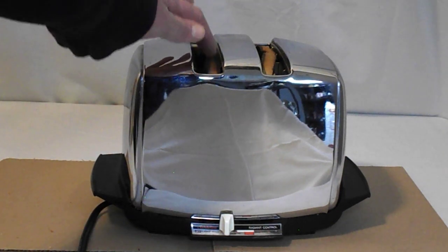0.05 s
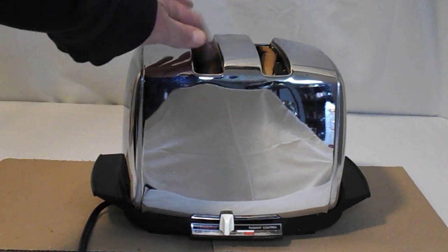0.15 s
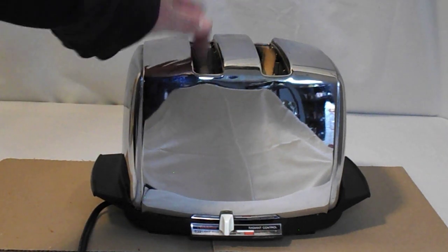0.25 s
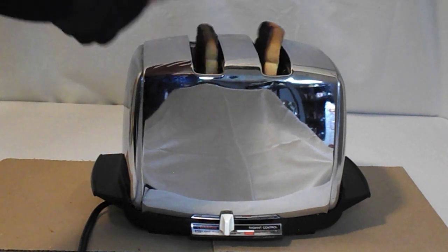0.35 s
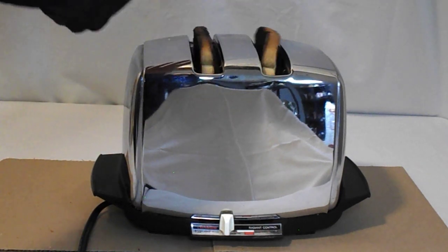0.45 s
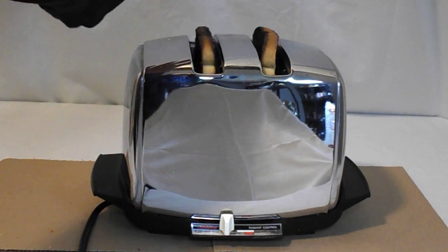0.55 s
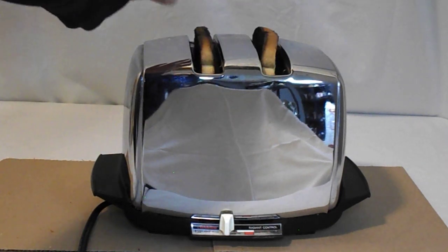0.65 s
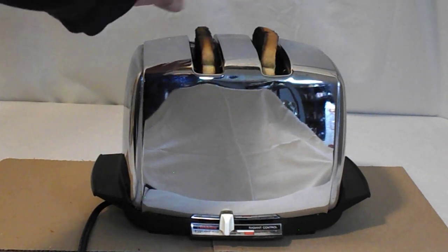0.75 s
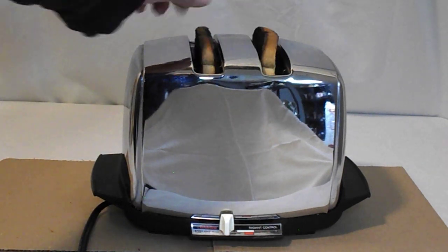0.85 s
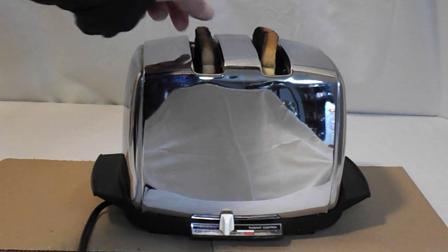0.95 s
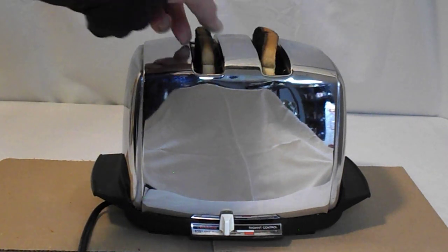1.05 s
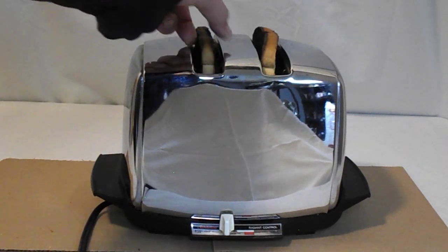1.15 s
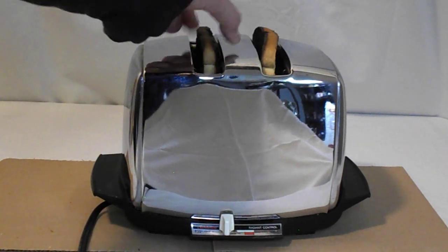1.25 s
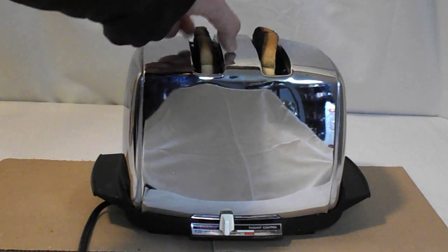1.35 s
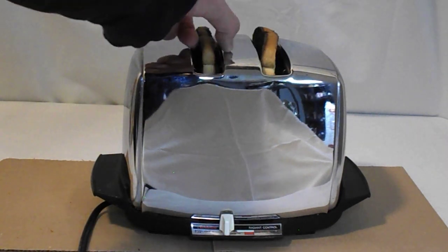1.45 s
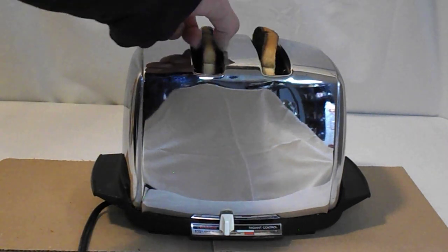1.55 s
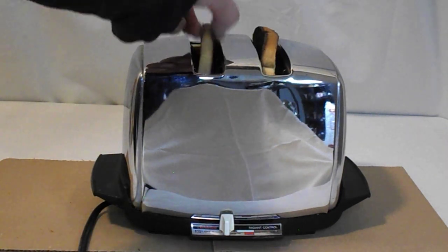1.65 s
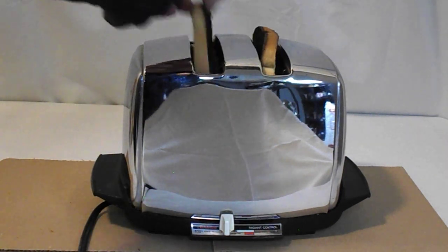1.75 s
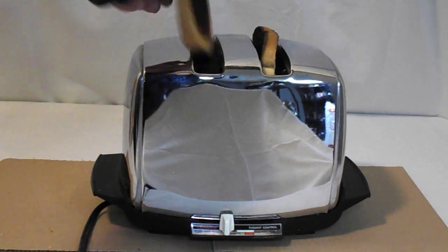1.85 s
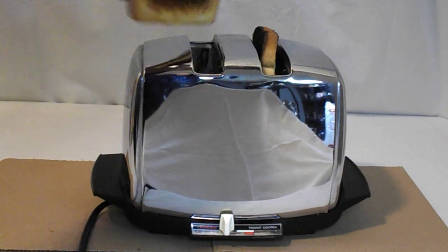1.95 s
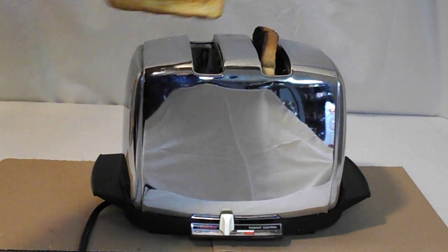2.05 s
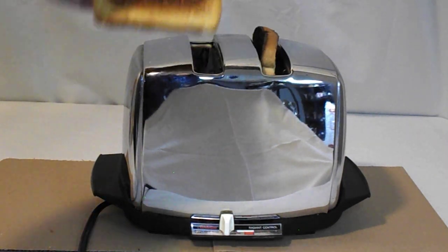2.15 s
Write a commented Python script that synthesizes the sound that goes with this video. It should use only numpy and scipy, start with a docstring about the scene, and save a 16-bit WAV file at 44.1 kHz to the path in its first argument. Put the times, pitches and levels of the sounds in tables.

```python
"""A small, quiet room: still air, and a chrome toaster heard through one narrow-band microphone.
First two slices of toast ride up: scraping bursts of grains and hard clacks ring steel modes; crusts squeal.
During the ride a wire starts to ring on, as two slowly beating sines; then a finger taps the shell, a knock and a tick.
Last, one slice is drawn out: it rasps in short grain bursts, plucks the guard wires, knocks the slot's rim
and makes the shell hum."""
import sys
import numpy as np
from scipy import signal
from scipy.fft import rfft, irfft
from scipy.io import wavfile
from scipy.ndimage import uniform_filter1d

SR = 44100
rng = np.random.default_rng(int(sys.argv[2]) if len(sys.argv) > 2 else 0)


def int16_out(signal):
    """Quantize to a 16-bit WAV file."""
    q = np.round(np.clip(np.atleast_2d(signal).T, -1, 1) * 32767)
    wavfile.write(sys.argv[1], SR, q.astype(np.int16))


N = 97020
T = np.arange(N) / SR  # seconds


def from_db(db):
    """Decibels to gain."""
    return 10 ** (np.asarray(db) / 20)


def unit(x):
    """Scale to an energy of one."""
    return x / np.sqrt(np.sum(x ** 2) + 1e-20)


def through(x, response):
    """Pass a sound through an impulse response."""
    return signal.fftconvolve(x, response[:N])[:N]


def colour(points, size=8192):
    """Causal, minimum-phase impulse response of a spectrum, by folding its cepstrum."""
    hz, db = np.transpose(points)
    bins = np.maximum(np.fft.rfftfreq(size, 1 / SR), 1)
    gain = from_db(np.interp(np.log(bins), np.log(hz), db))
    cepstrum = irfft(np.log(gain))
    cepstrum[1:size // 2] *= 2
    cepstrum[size // 2 + 1:] = 0
    return irfft(np.exp(rfft(cepstrum)))


def above(x, hz):
    """Second-order high-pass."""
    return signal.sosfilt(signal.butter(2, hz, "high", fs=SR, output="sos"), x)


def below(x, hz, order):
    """Low-pass of the given order."""
    return signal.sosfilt(signal.butter(order, hz, fs=SR, output="sos"), x)


def envelope(start, hold, fade, attack=0.0005):
    """Quick attack, hold, exponential release; all in seconds."""
    release = np.exp(-np.maximum(T - start - hold, 0) / max(fade, 1e-4))
    return np.clip((T - start) / attack, 0, 1) * release


def ring(modes, start=0):
    """Decaying sines set off at one moment."""
    t = np.maximum(T - start, 0)
    return sum(from_db(db - 60 * t / t60) * np.sin(2 * np.pi * hz * t) for hz, db, t60 in modes)


GRAINS_PER_S, GRAIN_SPREAD_DB = 2400, 4


def grains(rate, size=400):
    """Tiny fractures and slips of uneven size, at a steady mean level."""
    sizes = from_db(GRAIN_SPREAD_DB * np.minimum(rng.exponential(1, N), 4))
    clicks = (rng.random(N) < rate / SR) * rng.choice([-1, 1], N) * sizes
    local_power = np.maximum(uniform_filter1d(clicks ** 2, size), 0)
    return clicks / np.sqrt(local_power + 0.00081)


# modes of the steel shell: (pitch_hz, level_db, t60_s), levels relative
SHELL_MODES = [(440.4, -6, 0.4), (486, -5, 0.33), (543.4, -7.5, 0.27), (674, -10, 0.4), (1012, -16, .25),
               (1069, -6.5, 0.13), (1132, -7, 0.21), (1715, -10.5, 0.41), (2333, -6.5, 0.32),
               (2392, -8, 0.21), (3606, -12, 0.31), (3730, -8.5, 0.22), (4310, -5.5, 0.19),
               (5690, -7.5, .14)]
SHELL_LOW_HZ, RASP_DB = 400, 2
BRIGHT_ABOVE_HZ, CRACKLE_ABOVE_HZ, CRACKLES_PER_S = 2820, 5870, 550


def scrape(catches, spectrum, shell_db, paths):
    """Each catch is a burst of grains; the contact moves from point to point, and all of them ring the shell."""
    crumbs = above(above(grains(CRACKLES_PER_S), CRACKLE_ABOVE_HZ), CRACKLE_ABOVE_HZ)
    dull = below(grains(GRAINS_PER_S), BRIGHT_ABOVE_HZ, 2)
    sharp = above(grains(GRAINS_PER_S), BRIGHT_ABOVE_HZ)
    forces = []
    for start, db, hold, fade, bright_db, crackle_db in catches:
        texture = dull + from_db(bright_db) * sharp + from_db(crackle_db) * crumbs
        forces.append(from_db(db) * envelope(start, hold, fade) * texture)
    # successive catches take the paths in turn
    rasp = sum(through(sum(forces[k::len(paths)]), way) for k, way in enumerate(paths))
    shell = unit(above(above(ring(SHELL_MODES), SHELL_LOW_HZ), SHELL_LOW_HZ))
    direct = from_db(RASP_DB) * through(rasp, colour(spectrum))
    return direct + from_db(shell_db) * through(sum(forces), shell)


# carriage and crusts catch on the way up, levels relative:
# (start_s, level_db, hold_s, fade_time_constant_s, brightness_db, crumb_crackle_db)
RISE_CATCHES = [(.2132, -43, .006, 0.0076, -9, -38.5), (.234, -46, 0.01, 0.008, -8, 5.5),
                (.2715, -44, 0.0048, 0.0021, 2.5, -13), (.277, -38, 0.017, 0.018, -4, 2.5),
                (.3005, -40, 0.009, 0.011, 9.5, -6), (.333, -40, 0.017, 0.0046, -3, 9.5),
                (.357, -35.5, 0.018, 0.0054, 6, 3), (.380, -34, 0.0055, 0.0017, 3.5, -2),
                (.403, -34, 0.0094, 0.006, 0.5, 2), (.420, -33, 0.0059, 0.013, 0, 4),
                (.4545, -36.5, 0.0096, 0.015, -15, 4.5), (.504, -37.5, 0.0099, 0.021, -4, 6),
                (.537, -38, 0.031, 0.029, -5, 2), (.594, -46, 0.011, 0.0077, -10, -6),
                (.631, -49.5, 0.0071, 0.0029, 2, 7), (.680, -49, 0.0086, 0.0098, -3.5, -6),
                (.733, -56, 0.0092, 0.034, -8, -9)]
# spectrum of the rising scrape: (frequency_hz, relative_level_db)
RISE_SPECTRUM = [(30, -55), (120, -23.5), (370, -12), (435, -1), (620, 3.5), (870, -2.5), (1150, 2.5),
                 (1500, -1), (2700, 1.5), (4400, 3.5), (5400, 1), (6500, -0.5), (11000, -1.5)]


def rise(paths):
    """Carriage and crusts scrape up the slots in bursts and shake the shell."""
    return scrape(RISE_CATCHES, RISE_SPECTRUM, -9.5, paths)


# carriage and crust knock the guides, later the slot's rim:
# (start_s, clack_db, panel_ring_db), levels relative
HARD_KNOCKS = [(0.2131, -31, -41.5), (0.3021, -28, -42), (0.3527, -26.5, -44), (0.3817, -28.5, -38.5),
               (0.4193, -30, -44), (0.5377, -33.5, -47.5), (1.977, -44, -49)]
# spectrum of a clack: (frequency_hz, relative_level_db)
KNOCK_SPECTRUM = [(100, -32), (370, -23), (480, -6.5), (850, -12), (1250, 0.5), (2600, 3.5), (4300, 3),
                  (6000, -2), (7500, -5), (11000, -11.5)]
# modes of the top panel, also rung by the finger: (pitch_hz, level_db, t60_s), levels relative
PANEL_MODES = [(441, -16.5, 0.25), (543, -11, 0.042), (720, -18, 0.24), (1091, -8, 0.11),
               (1128, -7.5, 0.15), (1590, -8.5, 0.1), (1616, -14, 0.051), (2444, -24, .17),
               (2710, -20, 0.19)]
KNOCK_S = 0.0027  # both hold and fade time constant


def knocks(way):
    """Short, hard clacks of noise that also ring the top panel."""
    bursts = sum(from_db(db) * envelope(s, KNOCK_S, KNOCK_S, attack=0.00032) for s, db, _ in HARD_KNOCKS)
    force = bursts * rng.choice([-1, 1], N)
    panel = sum(from_db(db) * ring(PANEL_MODES, s) for s, _, db in HARD_KNOCKS)
    return through(through(force, colour(KNOCK_SPECTRUM)), way) + above(panel, SHELL_LOW_HZ)


# the crust sticks and slips on a guard wire: (start_s, level_db, length_s, mean_pitch_hz)
WIRE_SQUEALS = [(.3015, -35, 0.016, 4740), (0.353, -32, 0.0066, 4650), (0.375, -55, .005, 4270),
                (0.5385, -35, 0.0095, 4680), (0.535, -39.5, 0.011, 4850)]


def squeals(fade_s, waver_hz, size=150):
    """Stick and slip of crust on wire gives short whistles of unsteady pitch."""
    out = 0
    for start, db, length, hz in WIRE_SQUEALS:
        waver = np.sqrt(size) * uniform_filter1d(rng.standard_normal(N), size)
        phase = 2 * np.pi * np.cumsum(hz + waver_hz * waver) / SR
        out = out + from_db(db) * envelope(start, length, fade_s) * np.sin(phase)
    return out


SPRING_HZ, SPRING_S, SPRING_DB, SPRING_T60_S = 2763, .38, -55, 2.14
SPRING_SPLIT_HZ, SPRING_TWIN_DB = 1.16, -8


def spring():
    """A plucked wire swings in two planes at nearly the same pitch; the slow beat holds up its ring at first."""
    first = ring([(SPRING_HZ, SPRING_DB, SPRING_T60_S)], SPRING_S)
    twin = ring([(SPRING_HZ + SPRING_SPLIT_HZ, SPRING_DB + SPRING_TWIN_DB, SPRING_T60_S)], SPRING_S)
    return first - twin


# the slice drags out of its slot, levels relative:
# (start_s, level_db, hold_s, fade_time_constant_s, brightness_db, crumb_crackle_db)
PULL_CATCHES = [(1.684, -60.5, 0.012, .02, 4.5, -16), (1.729, -60.5, 0.041, 0.042, 5.5, 9),
                (1.818, -54.5, .012, 0.0075, 2, -6), (1.834, -57, 0.049, 0.012, 3, 8),
                (1.891, -49, 0.022, 0.0062, 0.5, -9), (1.924, -47, 0.0062, 0.0094, 4, 8),
                (1.973, -48, 0.016, 0.0074, -5.5, 9), (2.052, -57, .005, 0.013, -13, 4),
                (2.085, -59.5, 0.0071, 0.0037, -9.5, 9.5), (2.172, -66.5, 0.0026, 0.0035, 11, -4)]
# spectrum of the drawn-out scrape: (frequency_hz, relative_level_db)
PULL_SPECTRUM = [(30, -27), (120, -20.5), (300, 1), (550, 5.5), (850, -0.5), (1150, 4), (1800, 3),
                 (2500, -6), (3300, 0.5), (4000, 5), (5000, -3), (6500, -5.5), (11000, -6)]


def pull(paths):
    """One slice rasps out of its slot in bursts and shakes the shell."""
    return scrape(PULL_CATCHES, PULL_SPECTRUM, -17, paths)


# the slice leans on the shell: (start_s, level_db, length_s); length is both swell and hold
SHELL_LEANS = [(1.691, -55, 0.013), (1.838, -50.5, 0.028), (1.892, -42, 0.015), (1.987, -42.5, 0.0083),
               (2.082, -56, 0.0083)]
HUM_HZ, HUM_T60_S = 436, .19


def shell_hum():
    """A low shell mode swells while the slice leans on it, then dies away; leans add in power."""
    fade = HUM_T60_S / np.log(1000)
    power = sum((from_db(db) * envelope(s, length, fade, length)) ** 2 for s, db, length in SHELL_LEANS)
    return np.sqrt(power) * np.sin(2 * np.pi * HUM_HZ * T)


# the crust plucks a guard wire: (start_s, level_db), relative
WIRE_PLUCKS = [(1.729, -53.5), (1.756, -56.5), (1.835, -48), (1.893, -48.5)]
# modes of a guard wire: (pitch_hz, mean_level_db, t60_s), levels relative
WIRE_MODES = [(1665, -10, 0.7), (2114, -9, 0.48), (3030, -11, 0.54), (3760, -7, 0.21), (3840, -9, 0.14),
              (4040, -1, 0.17), (4820, -8.5, 0.26), (5315, -4.5, 0.11), (6280, -5, 0.079),
              (9330, -1, 0.093), (11100, -6, .11)]
PLUCK_RISE_S = 0.0048


def guard_wire():
    """Each pluck rings the wire's modes with new strengths."""
    out = 0
    for start, db in WIRE_PLUCKS:
        modes = [(hz, db + mode_db + rng.normal(0, 0.93), t60) for hz, mode_db, t60 in WIRE_MODES]
        out = out + ring(modes, start) * np.clip((T - start) / PLUCK_RISE_S, 0, 1)
    return out


# spectrum of the nail's tick: (frequency_hz, relative_level_db)
TAP_SPECTRUM = [(100, -11), (500, -1), (870, -8), (1400, 6.5), (2200, -1.5), (2900, -3.5), (3800, -2.5),
                (6500, -8.5), (11000, -3.5)]
TAP_S, TAP_DB, TAP_TICK_DB, TAP_SOFT_S = 1.1615, -36.5, -44, 0.0044


def finger_tap(way):
    """A soft fingertip rings the top panel with a slowed onset; the nail adds a tick of grains."""
    knock = from_db(TAP_DB) * ring(PANEL_MODES, TAP_S) * np.clip((T - TAP_S) / TAP_SOFT_S, 0, 1)
    tick = from_db(TAP_TICK_DB) * envelope(TAP_S, 0.0048, 0.0071) * grains(GRAINS_PER_S)
    return knock + through(through(tick, unit(colour(TAP_SPECTRUM))), way)


CASE_T60_S, CASE_DB = 0.054, -1
ROOM_T60_S, ROOM_DB, WALL_CUT_HZ = 0.17, -1, 6040


def echoes(t60):
    """Dense dying reflections with an even spectrum."""
    white = irfft(np.exp(2j * np.pi * rng.random(N // 2 + 1)), N)
    return unit(white * from_db(-60 * T / t60))


def room_echoes():
    """The room's reflections have lost some treble."""
    return unit(below(echoes(ROOM_T60_S), WALL_CUT_HZ, 1))


def path(room):
    """From one point of contact to the microphone: direct, around the steel case, and through the room."""
    case = from_db(CASE_DB) * echoes(CASE_T60_S)
    return unit(signal.unit_impulse(N) + case + from_db(ROOM_DB) * room)


# spectrum of the still air: (frequency_hz, relative_level_db)
AIR_SPECTRUM = [(20, 10), (40, -54), (60, -2.5), (95, -5.5), (120, 2.5), (160, 0), (230, 2), (400, -1.5),
                (700, -3), (1200, -8.5), (2500, -13), (4200, -14.5), (6300, -21), (11000, -13)]


def still_air():
    """The quiet room's background is steady noise, strongest in the bass."""
    return from_db(-60) * through(rng.standard_normal(N), unit(colour(AIR_SPECTRUM)))


def scene(count=4):
    """All the toaster's sounds in the room, over still air."""
    paths = [path(room_echoes()) for _ in range(count)]
    rise_and_knocks = rise(paths) + knocks(paths[0])
    pull_and_hum = pull(paths) + shell_hum()
    wires = squeals(fade_s=0.01, waver_hz=80) + guard_wire()
    wires = wires + from_db(-8.5) * through(wires, room_echoes())
    return (rise_and_knocks + pull_and_hum + wires + finger_tap(paths[1]) + spring() + still_air())[None]


# the microphone's broad response, before its cuts and nulls: (frequency_hz, gain_db)
MICROPHONE_RESPONSE = [(20, 5), (5800, 0), (6450, -2.5), (7100, -8), (9300, -10.5), (11000, -10),
                       (11800, -33)]
LOW_CUT_HZ, CUTOFF_HZ, NULL_WIDTH_HZ = 44, 11800, 1330


def record(dry):
    """The microphone's treble drops above 6.5 kHz, with three nulls, and ends in a steep cut."""
    x = through(above(dry[0], LOW_CUT_HZ), colour(MICROPHONE_RESPONSE))
    for null_hz in (6980, 8460, 10020):
        x = signal.lfilter(*signal.iirnotch(null_hz, null_hz / NULL_WIDTH_HZ, fs=SR), x)
    steep_cut = signal.ellip(10, .2, 80, CUTOFF_HZ, fs=SR, output="sos")
    return signal.sosfilt(steep_cut, x)[None]


dry = scene()
out = record(dry)
int16_out(out)
```